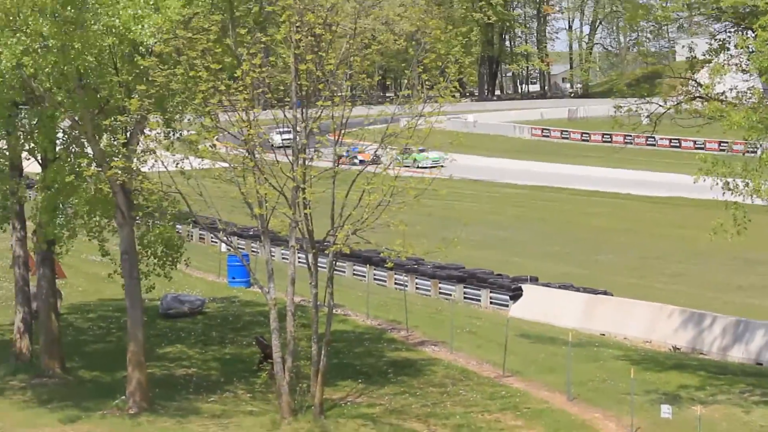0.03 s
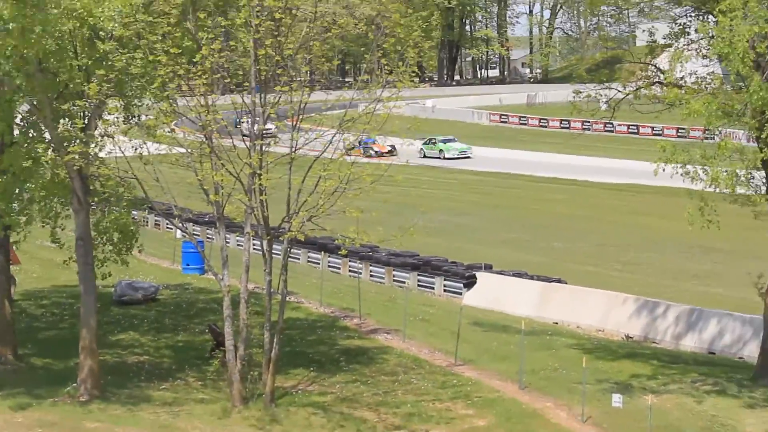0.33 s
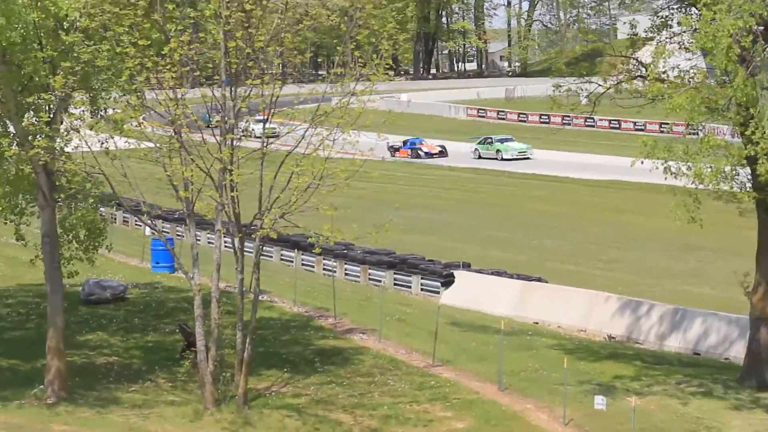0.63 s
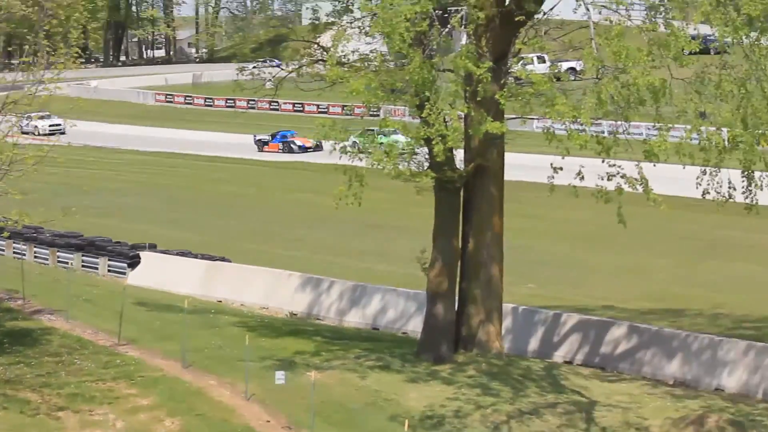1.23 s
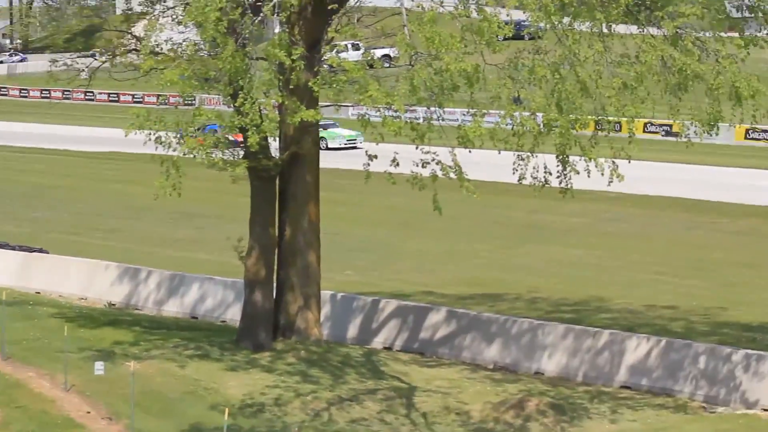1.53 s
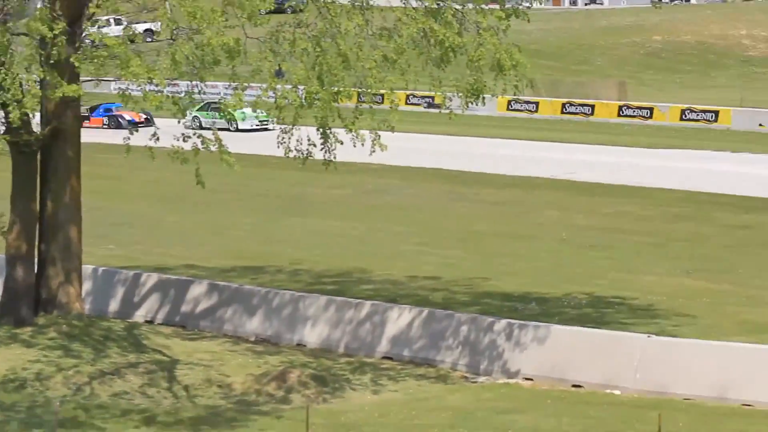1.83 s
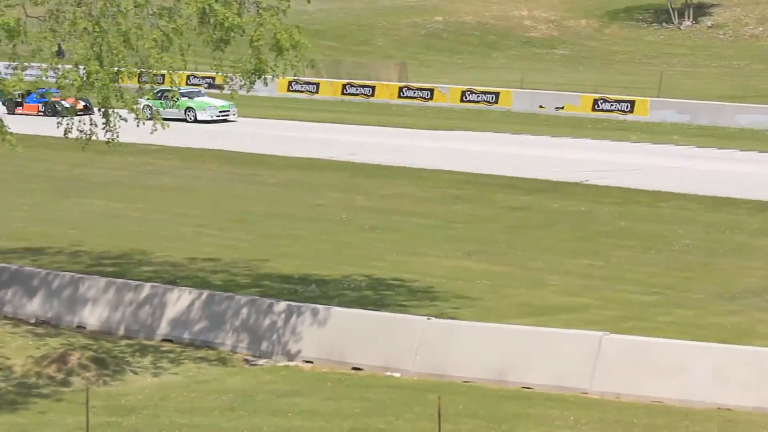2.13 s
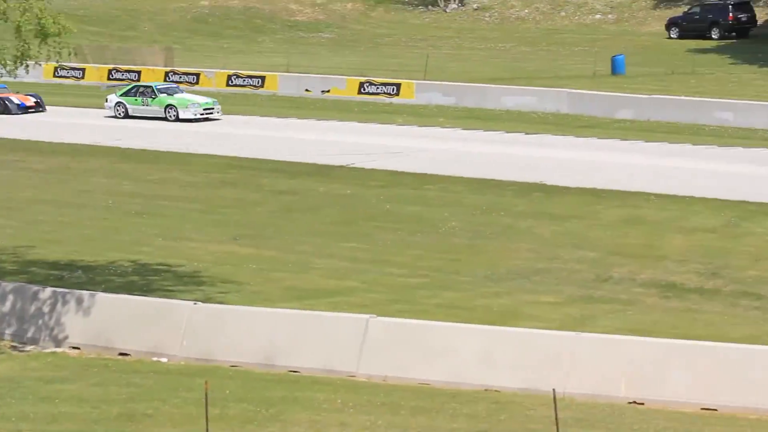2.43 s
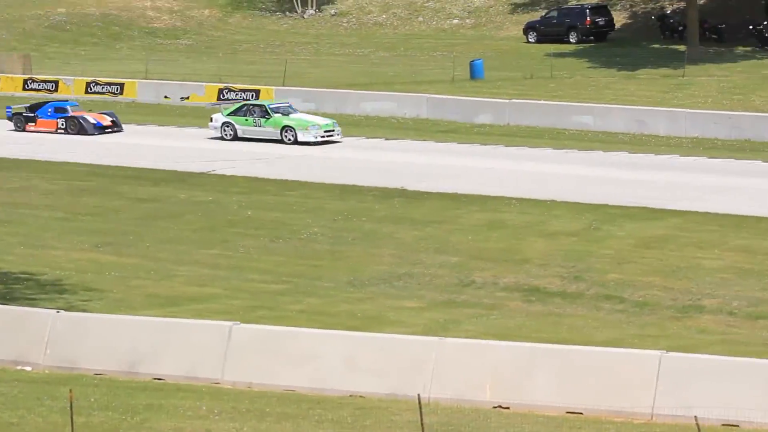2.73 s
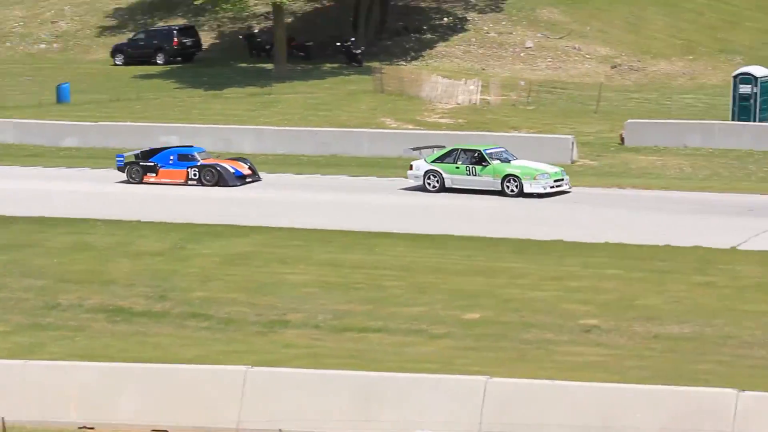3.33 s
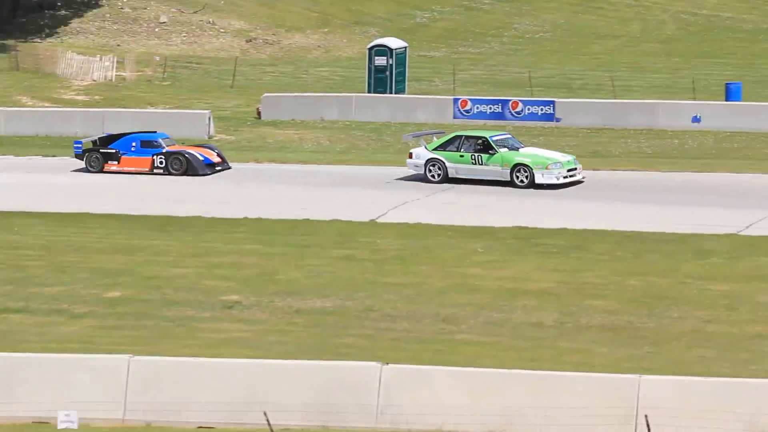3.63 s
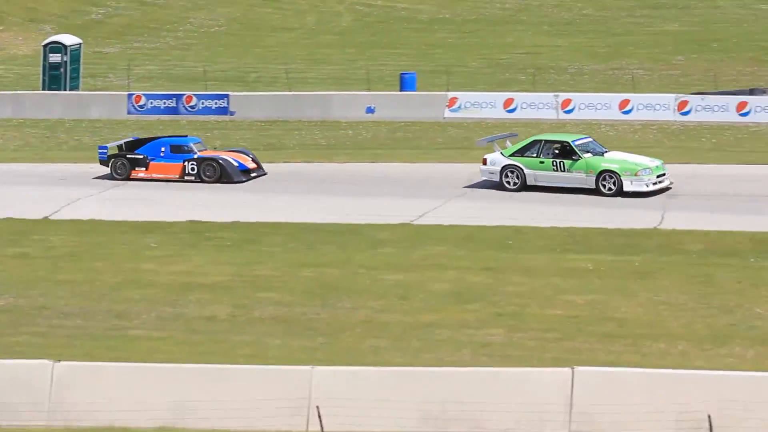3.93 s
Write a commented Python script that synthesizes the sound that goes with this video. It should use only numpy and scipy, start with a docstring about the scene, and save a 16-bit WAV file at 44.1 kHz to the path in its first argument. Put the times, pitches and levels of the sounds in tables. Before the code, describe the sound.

Race car engines roar as a pack accelerates along an outdoor track, drawing closer.

```python
"""A roaring pack of eight-cylinder race cars accelerates out of a bend and up a straight toward the listener.
The lead car climbs in pitch and lifts off at 2.8 s; the cars behind keep pulling, exhausts crackling.
Each engine sings at multiples (orders) of its cycle rate, 1/8 of its firing rate, over the noise of
exhaust gas and tyres. Trees and walls scatter the sound."""
import sys
import numpy as np
from scipy import signal
from scipy.fft import rfft, irfft, next_fast_len
from scipy.io import wavfile
from scipy.ndimage import map_coordinates

SR = 44100
rng = np.random.default_rng(int(sys.argv[2]) if len(sys.argv) > 2 else 0)


def generate_wav(signal):
    """Clip the signal to [-1, 1] and save it as 16-bit WAV at the path in sys.argv[1]."""
    frames = np.transpose(np.atleast_2d(signal))
    scaled = np.clip(frames, -1, 1) * 32767
    pcm = np.round(scaled).astype(np.int16)
    wavfile.write(sys.argv[1], SR, pcm)


N = 176400
CYLINDERS = 8


def amp(db):
    """Decibels to gain."""
    return 10 ** (np.asarray(db) / 20)


def unit(x):
    """Scale to rms 1."""
    return x / np.sqrt(np.mean(x ** 2) + 1e-20)


def gain_at(spectrum, hz):
    """Gain from (f/Hz, level/dB) points on a log frequency axis."""
    f, db = np.transpose(spectrum)
    return amp(np.interp(np.log(hz + 1), np.log(f + 1), db))


def curves(rows):
    """One per-sample curve for each column after t/s."""
    t_s, *columns = np.transpose(rows)
    return [np.interp(np.arange(N) / SR, t_s, column) for column in columns]


def wobble(knots_per_s):
    """Smooth random curve, rms about 1."""
    grid = np.linspace(0, N / SR * knots_per_s, 1024)
    spline = map_coordinates(rng.standard_normal(1024), [grid], mode='wrap')
    return np.interp(np.linspace(0, grid[-1], N), grid, spline)


def filtered(x, response):
    """Zero-phase filter with gain response(hz)."""
    size = next_fast_len(N + SR // 2)
    return irfft(rfft(x, size) * response(np.fft.rfftfreq(size, 1 / SR)), size)[..., :N]


def noise(spectrum):
    """Coloured noise, rms 1."""
    return unit(filtered(rng.standard_normal(N), lambda hz: gain_at(spectrum, hz)))


def pop(spectrum, size=1024):
    """Minimum-phase pressure pulse, peak 1."""
    cepstrum = irfft(np.log(gain_at(spectrum, np.fft.rfftfreq(size, 1 / SR))))
    cepstrum[1:size // 2] *= 2
    cepstrum[size // 2 + 1:] = 0
    pulse = irfft(np.exp(rfft(cepstrum)))
    return pulse / np.abs(pulse).max()


def engine_cycles(firing_hz, jitter=.0008):
    """Cycles turned so far, at a slightly uneven speed."""
    return np.cumsum(firing_hz * (1 + jitter * wobble(25))) / SR / CYLINDERS


def engine_lines(cycles, orders, blur_rad_per_order=0, fade_db=2.2, fuzz=.15):
    """One sine per (order, rms level/dB), each fading and blurring on its own in turbulent air."""
    out = np.zeros(N)
    for order, db in orders:
        phase = 2 * np.pi * (order * cycles + rng.random())
        phase += (fuzz + blur_rad_per_order * order) * wobble(45)
        out += amp(db + fade_db * wobble(7)) * (1 + fuzz * wobble(70)) * np.sin(phase)
    return np.sqrt(2) * out


# envelopes: t/s, relative level/dB
BOOM_DB = [(0, -16), (.8, -17), (1.2, -21.5), (2.15, -20.5), (2.5, -27.5), (2.8, -23), (3.1, -16.5),
           (3.5, -18), (3.75, -28.5), (4, -25)]
RUMBLE_DB = [(0, -38.5), (1.2, -40), (2.4, -49.5), (4, -64)]
# surges: t/s, boost/dB
SURGES_DB = [(.07, 5), (.36, 3.5), (.81, 3.5)]
# spectra: f/Hz, relative level/dB
BOOM_SPECTRUM = [(50, -43.5), (85, -1), (120, 13), (160, 7), (220, 14), (320, 13), (420, 12), (520, 2.5),
                 (640, 9.5), (1000, -73)]
RUMBLE_SPECTRUM = [(15, -38.5), (30, -15.5), (45, 22), (80, 28), (130, 25), (300, -91.5)]


def exhaust_boom(boom_trim_db=-6, surge_s=.04):
    """Boom and deep rumble, surging as the pack powers out of the bend."""
    boom = amp(curves(BOOM_DB)[0] + boom_trim_db) * noise(BOOM_SPECTRUM)
    rumble = amp(curves(RUMBLE_DB)[0]) * noise(RUMBLE_SPECTRUM)
    t_s = np.arange(N) / SR
    surge_db = sum(db * np.exp(-((t_s - at_s) / surge_s) ** 2) for at_s, db in SURGES_DB)
    return amp(surge_db) * (boom + rumble)


# roar envelope: t/s, relative middle level/dB, treble level/dB
ROAR_DB = [(0, -14, -34), (.1, -16, -34.5), (.22, -17.5, -33), (.85, -16.5, -28), (1.25, -16.5, -27.5),
           (1.42, -20.5, -23.5), (1.6, -17, -28), (1.82, -18.5, -24.5), (1.93, -20.5, -28.5),
           (2.05, -15, -25.5), (2.19, -26, -21), (2.38, -22, -26.5), (2.53, -24, -26.5),
           (2.7, -24.5, -24.5), (2.88, -23.5, -29), (3.13, -15, -25), (3.5, -18, -28), (3.6, -16, -24.5),
           (3.87, -22, -31), (3.96, -14, -24.5), (4, -20.5, -26)]
# hiss envelope: t/s, level/dB
HISS_DB = [(0, -73.5), (1.4, -64.5), (2.4, -49), (2.75, -53.5), (3, -43), (3.7, -40.5), (3.9, -43.5),
           (3.97, -27), (4, -39)]
# spectra: f/Hz, relative level/dB
MIDDLE_SPECTRUM = [(200, -23.5), (400, -10), (510, -7.5), (700, -2), (1000, -3), (1400, -2), (1850, -6),
                   (2400, -14), (4500, -34), (7000, -63.5), (8500, -120)]
TREBLE_SPECTRUM = [(1400, -25), (2100, 2), (3300, -2), (4200, -7.5), (5200, -13), (6500, -25), (7500, -39),
                   (8800, -100)]
HISS_SPECTRUM = [(3000, -20), (5500, 0), (7400, 0), (8400, -8), (10300, -34)]


def pack_roar(cycles, middle_trim_db=-3.5, throb_depth=.13, flutter_db=.7):
    """Turbulent exhaust gas and tyre noise, throbbing at one engine's firing rate."""
    middle_db, treble_db = curves(ROAR_DB)
    throb = unit(1 + throb_depth * np.cos(2 * np.pi * CYLINDERS * cycles))
    flutter = amp(flutter_db * wobble(45))
    middle = amp(middle_db + middle_trim_db) * noise(MIDDLE_SPECTRUM)
    treble = amp(treble_db) * noise(TREBLE_SPECTRUM)
    hiss = amp(curves(HISS_DB)[0]) * noise(HISS_SPECTRUM)
    return throb * flutter * (middle + treble + hiss)


# cars far off at high revs, picking up in a higher gear, back in the pack: t/s, firing f/Hz, level/dB
DISTANT_RUN = [(0, 368, -39), (.8, 386, -33), (1.4, 406, -36), (1.75, 420, -30), (2.2, 435, -33),
               (2.7, 444, -33), (2.95, 440, -41), (4, 414, -35)]
PICKUP_RUN = [(3.1, 287, -54), (3.27, 292.8, -25.5), (3.5, 304.8, -28.5), (3.75, 304.7, -38),
              (4, 323.2, -37)]
TRAILING_RUN = [(0, 199, -29), (.4, 212, -33), (1.4, 236, -46), (2.1, 256, -27), (2.35, 263, -37),
                (2.62, 270, -35), (2.8, 268, -48)]
# their lines: order, relative level/dB
DISTANT_ORDERS = [(4, -5), (8, 0)]
PICKUP_ORDERS = [(3, -6), (5, 3.5), (6, -5.5), (8, -3)]
TRAILING_ORDERS = [(4, -18.5), (8, 1)]


def pack_car(run, orders):
    """An engine of which only a few lines carry."""
    firing_hz, level_db = curves(run)
    return engine_lines(engine_cycles(firing_hz), [(order, level_db + db) for order, db in orders])


# firing pulse spectrum: f/Hz, relative level/dB
FIRING_SPECTRUM = [(60, -25), (250, -3), (1000, 0), (2200, -2), (3500, -10), (6500, -30), (7800, -50),
                   (9000, -90)]


def firings(cycles, cylinder_spread_db, chance_spread_db, scatter_s=.0004):
    """One pulse per firing; size varies by cylinder and by chance, turbulence scatters the arrival."""
    fired = np.flatnonzero(np.diff(np.floor(cycles * CYLINDERS)))
    cylinder = rng.standard_normal(CYLINDERS)[np.arange(len(fired)) % CYLINDERS]
    chance, delay = np.minimum(rng.standard_normal((2, N))[:, :len(fired)], 2)
    arrivals = np.clip(fired + delay * scatter_s * SR, 0, N - 1).astype(int)
    train = np.bincount(arrivals, amp(cylinder_spread_db * cylinder + chance_spread_db * chance), N)
    return -unit(signal.fftconvolve(train - train.mean(), pop(FIRING_SPECTRUM))[:N])


# crackle envelope: t/s, level/dB
CRACKLE_DB = [(0, -31), (2.3, -29), (2.85, -35), (3.63, -26), (4, -29)]


def exhaust_crackle(lead_cycles, second_cycles):
    """Rasp of the two front cars' firing pulses."""
    lead = firings(lead_cycles, cylinder_spread_db=0, chance_spread_db=3)
    second = firings(second_cycles, cylinder_spread_db=1.5, chance_spread_db=6.5)
    return amp(curves(CRACKLE_DB)[0]) * unit(lead + second)


# cracks: t/s, peak level/dB before clipping
CRACKS_DB = [(3.636, -18.5), (3.697, -16.5), (3.738, -8.5), (3.9688, 0.5), (3.978, 1.5)]
# crack spectrum: f/Hz, relative level/dB
CRACK_SPECTRUM = [(80, -7.5), (400, 1), (2500, 12), (7000, -5), (11000, -2.5)]


def exhaust_cracks():
    """Single sharp pressure pulses from the nearest exhaust."""
    t_s, peak_db = np.transpose(CRACKS_DB)
    train = np.bincount(np.round(t_s * SR).astype(int), amp(peak_db), N)[:N]
    return -signal.fftconvolve(train, pop(CRACK_SPECTRUM))[:N]


# second car's revs: t/s, firing f/Hz
SECOND_FIRING_HZ = [(0, 238), (1.2, 269), (2, 302.5), (2.7, 325), (3.1, 338.5), (3.3, 346.5), (3.65, 357),
                    (4, 372)]
# its envelope: t/s, firing note level/dB, overtone level/dB
SECOND_DB = [(0, -32.5, -33), (2.6, -36, -46), (2.9, -29, -41), (3.12, -22.5, -32), (3.45, -29, -36),
             (3.62, -30, -29.5), (3.78, -36, -32), (4, -33, -42)]
# its close-range overtones: t/s, level/dB
CLOSE_DB = [(3.5, -70), (3.75, -39), (3.95, -27)]
# both overtone sets: order, relative level/dB
SECOND_ORDERS = [(5, -5), (16, -8), (19, -3), (22, -4), (25, -4), (35, 0), (37, 1.5), (45, -6), (52, -6),
                 (64, -5)]
CLOSE_ORDERS = [(16, 0), (34, -3), (50, -1)]


def second_car(cycles):
    """Keeps accelerating as the lead car lifts off; more overtones break out as it draws level."""
    note_db, overtone_db = curves(SECOND_DB)
    close_db, = curves(CLOSE_DB)
    lines = [(CYLINDERS, note_db)]
    lines += [(order, overtone_db + db) for order, db in SECOND_ORDERS]
    lines += [(order, close_db + db) for order, db in CLOSE_ORDERS]
    return engine_lines(cycles, lines)


def resonance_gain(peaks, hz):
    """Exhaust resonances, summed in power."""
    grid_hz = np.arange(0, SR / 8, 2)
    power = sum(amp(db) ** 2 / (1 + (2 * (grid_hz - centre_hz) / width_hz) ** 2)
                for centre_hz, width_hz, db in peaks)
    return np.interp(hz, grid_hz, np.sqrt(power))


# lead car's revs: t/s, firing f/Hz
LEAD_FIRING_HZ = [(0, 298), (.35, 306), (.7, 317), (1.4, 351), (1.8, 368.5), (2.4, 395), (2.75, 404),
                  (2.86, 389), (3.2, 381), (4, 360)]
# its pass: t/s, firing note level/dB, overtone level/dB, aspect (0 head-on, 1 side-on)
LEAD_PASS = [(0, -33, -35, 0), (.45, -23, -34, 0), (.72, -26, -33, 0), (.98, -30, -27.5, 0),
             (1.4, -27, -27.5, 0), (1.6, -26, -31, .1), (1.78, -18.5, -28.5, .3), (2.05, -27, -27.5, .8),
             (2.38, -31, -25, 1), (2.53, -33, -31, 1), (2.72, -32, -25.5, 1), (2.85, -29, -37, 1),
             (3.4, -46, -55, 1)]
# snarl, a bright peak climbing as the car swings past: t/s, f/Hz, level/dB
SNARL_PEAK = [(.8, 1700, -46), (1.2, 1750, -28.5), (1.43, 1820, -27.5), (1.6, 1900, -40), (1.82, 2190, -29),
              (2.02, 2380, -40), (2.42, 2500, -26.5), (2.5, 2560, -46), (2.56, 2900, -40),
              (2.72, 2920, -31), (2.9, 2920, -62)]
# coasting drone: t/s, level/dB
COAST_DB = [(2.8, -48), (2.95, -24.5), (3.12, -24), (3.3, -33.5), (3.6, -28), (3.78, -43.5)]
# drone lines: order, relative level/dB
COAST_ORDERS = [(3, 1.5), (6, -12.5)]
# uneven firing of the two banks: gain/dB at 0-4 orders from a multiple of the firing rate
BANK_DB = [0, -5.5, -11, -3, -4]
# exhaust resonances: f/Hz, width/Hz, gain/dB
HEAD_ON_PEAKS = [(925, 20, 1.5), (993, 44, 4), (1385, 60, 1.5), (1505, 40, -1), (1845, 45, 2),
                 (2150, 70, -4), (3600, 1000, -22)]
SIDE_ON_PEAKS = [(680, 130, -4), (802, 30, 3.5), (1030, 60, -4), (1168, 18, 2.5), (1380, 70, 4.5),
                 (1590, 55, -1.5), (1900, 130, -4), (3300, 260, -11), (4000, 200, -14)]


def lead_car(cycles, top_order=83, snarl_width_hz=170, far_blur_rad_per_order=.005):
    """Overtones flare in the exhaust's resonances and sharpen as the car nears; coasting, it drones."""
    note_db, overtone_db, aspect = curves(LEAD_PASS)
    snarl_hz, snarl_db = curves(SNARL_PEAK)
    coast_db, = curves(COAST_DB)
    cycle_hz = curves(LEAD_FIRING_HZ)[0] / CYLINDERS
    lines = [(CYLINDERS, note_db)] + [(order, coast_db + db) for order, db in COAST_ORDERS]
    for order in range(CYLINDERS + 1, top_order + 1):
        hz = order * cycle_hz
        head_on = (1 - aspect) * resonance_gain(HEAD_ON_PEAKS, hz)
        side_on = aspect * resonance_gain(SIDE_ON_PEAKS, hz)
        bank_db = BANK_DB[min(order % CYLINDERS, -order % CYLINDERS)]
        overtone = amp(overtone_db + bank_db) * (head_on + side_on)
        snarl = amp(snarl_db) / (1 + (2 * (hz - snarl_hz) / snarl_width_hz) ** 2)
        lines.append((order, 20 * np.log10(np.hypot(overtone, snarl))))
    return engine_lines(cycles, lines, far_blur_rad_per_order * (1 - aspect))


# stereo width: f/Hz, side level/dB re mid
WIDTH_DB = [(400, -39), (2000, -25), (8000, -11)]


def trackside_scatter(mid, rt60_s=.06):
    """Side signal: short reflections off trees and walls, mostly treble."""
    t_s = np.arange(SR // 10) / SR
    tail = rng.standard_normal(len(t_s)) * amp(-60 * t_s / rt60_s)
    reflections = signal.fftconvolve(mid, tail / np.linalg.norm(tail))[:N]
    return filtered(reflections, lambda hz: gain_at(WIDTH_DB, hz))


def scene(balance_db=-.15):
    """All cars straight ahead, widened a little by scattered sound."""
    lead_cycles = engine_cycles(curves(LEAD_FIRING_HZ)[0])
    second_cycles = engine_cycles(curves(SECOND_FIRING_HZ)[0])
    mid = pack_car(DISTANT_RUN, DISTANT_ORDERS)
    mid += pack_car(PICKUP_RUN, PICKUP_ORDERS)
    mid += pack_car(TRAILING_RUN, TRAILING_ORDERS)
    mid += lead_car(lead_cycles) + second_car(second_cycles)
    mid += exhaust_crackle(lead_cycles, second_cycles) + exhaust_cracks()
    mid += pack_roar(second_cycles) + exhaust_boom()
    side = trackside_scatter(mid)
    return np.array([(mid + side) * amp(balance_db / 2), (mid - side) * amp(-balance_db / 2)])


def record(dry, clip_level=.92, cutoff_hz=10400):
    """Hard clip of the highest peaks, then a brick-wall low-pass."""
    return filtered(np.clip(dry, -clip_level, clip_level), lambda hz: hz < cutoff_hz)


dry = scene()
out = record(dry)
generate_wav(out)
```